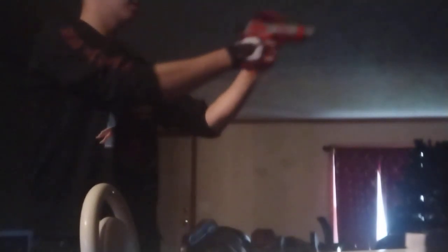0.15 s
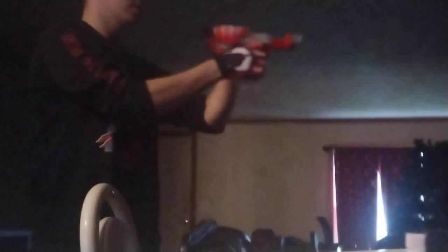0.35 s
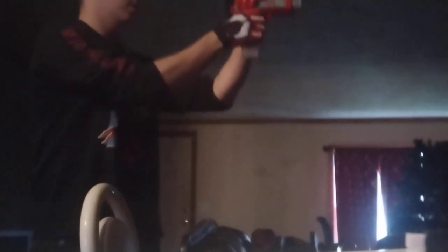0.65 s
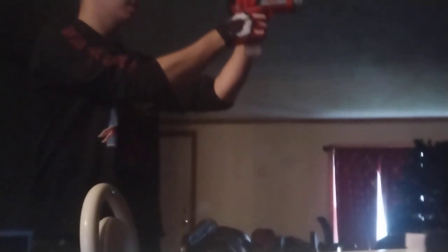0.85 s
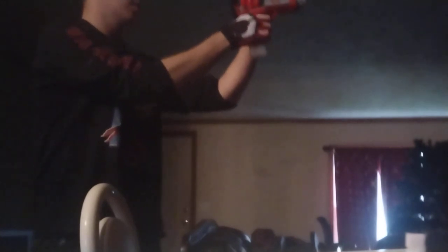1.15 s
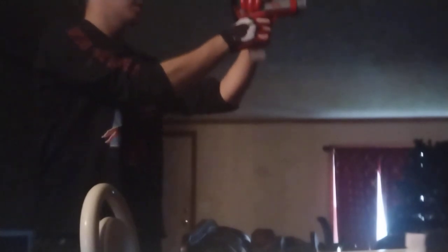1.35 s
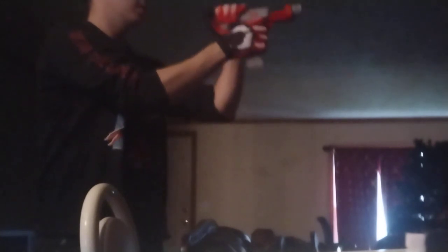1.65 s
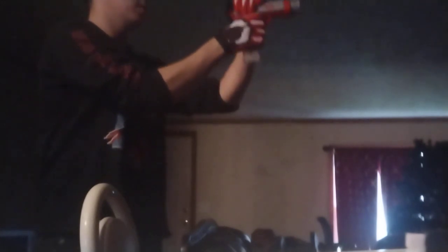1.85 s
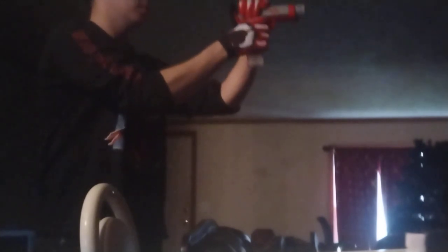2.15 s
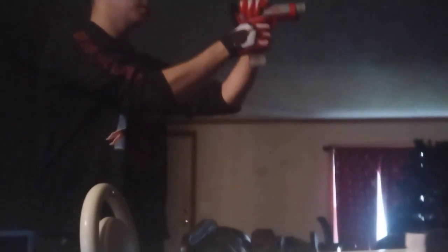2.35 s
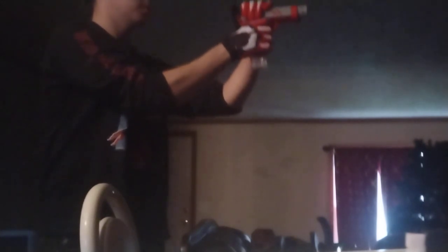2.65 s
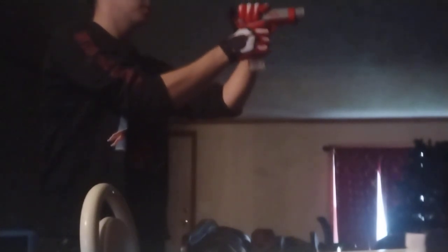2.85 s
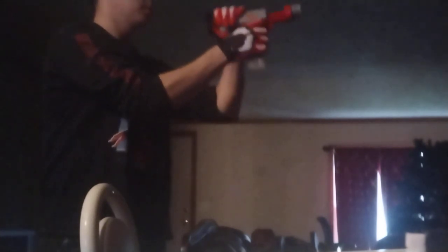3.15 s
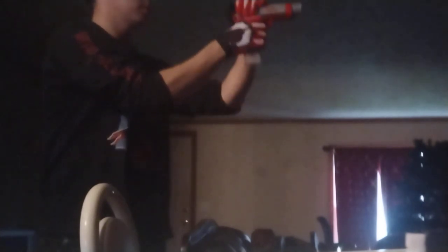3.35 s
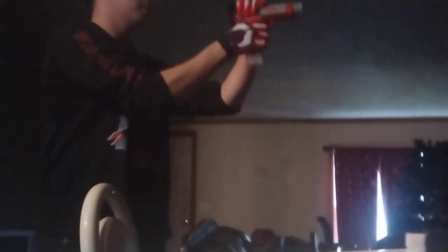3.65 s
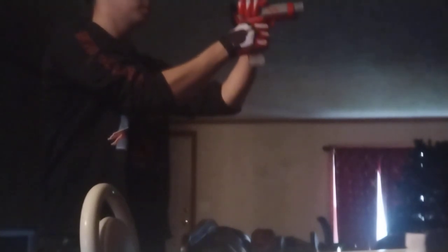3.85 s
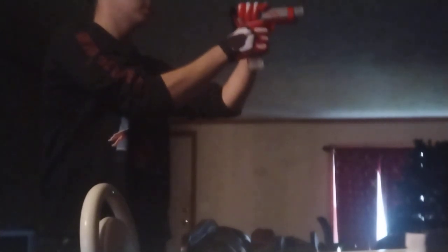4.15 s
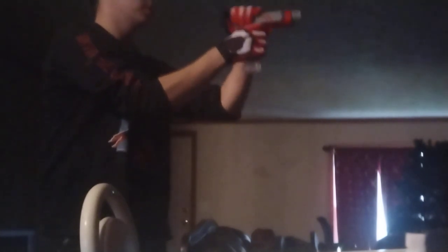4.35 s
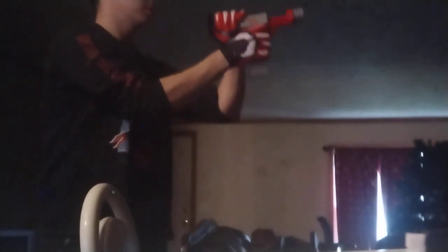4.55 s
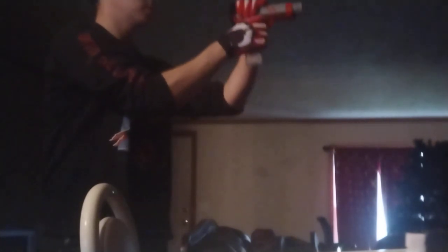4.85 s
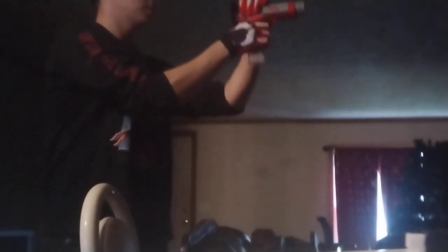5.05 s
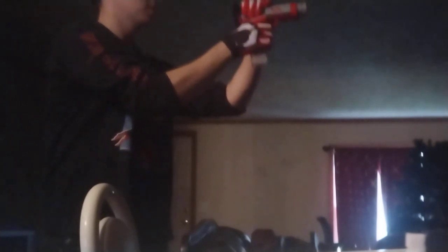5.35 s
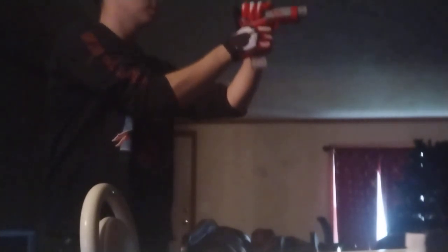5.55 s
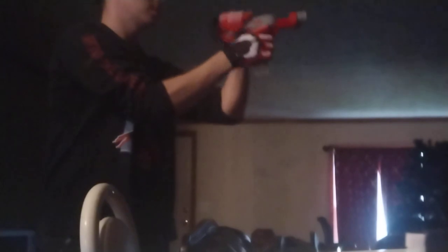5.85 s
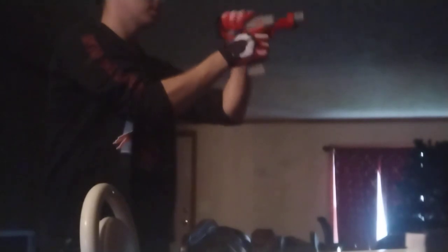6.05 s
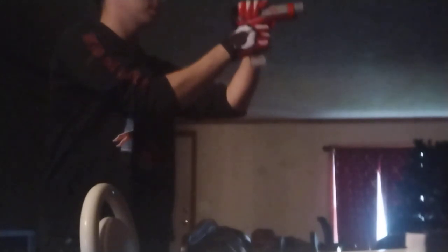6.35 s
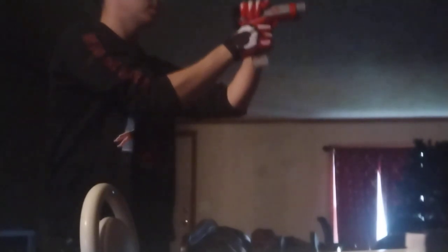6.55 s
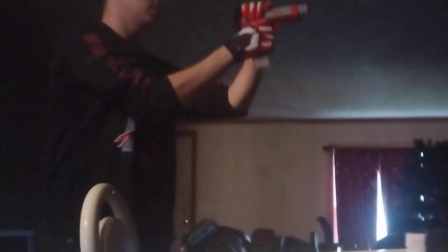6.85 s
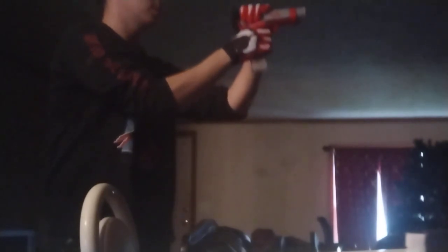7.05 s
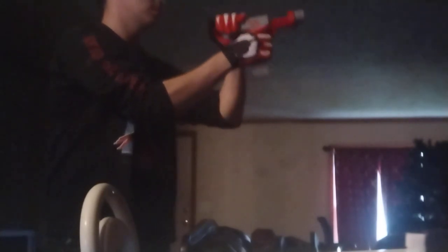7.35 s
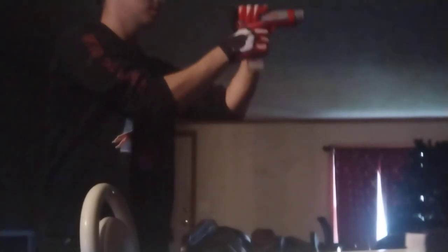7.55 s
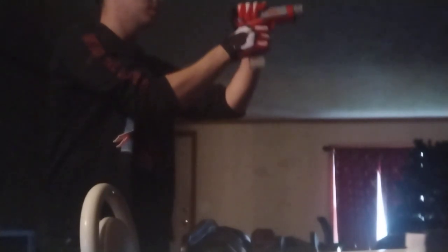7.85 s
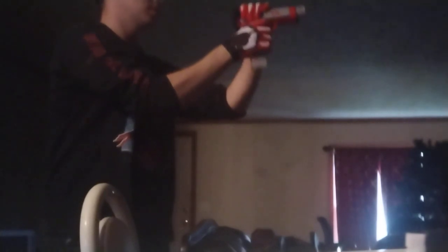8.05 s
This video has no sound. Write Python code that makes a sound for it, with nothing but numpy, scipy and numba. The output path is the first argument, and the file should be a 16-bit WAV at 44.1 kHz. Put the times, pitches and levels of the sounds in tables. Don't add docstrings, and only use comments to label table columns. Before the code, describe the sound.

A stereo microphone about two metres away in a small furnished room hears a spring toy blaster over faint, low, slightly swelling hum. The tail of a pop opens the scene; a trigger click at 0.3 s leads to a quick rising plastic zip at 0.4 and a bright, hard slide slam at 0.64. A dull, hollow air pop follows at 1.3, a louder zip at 1.6 and the hardest slam at 1.8, with a soft dart thud just after. The cycle repeats more slowly: pops at 2.7, 4.05, 5.45 and a fainter one at 6.86; ratcheting pulls at 3.0, 4.4, 5.9 and 7.3; somewhat softer slams at 3.35, 4.8, 6.2 and 7.6. Tiny clicks and catch ticks surround the strokes. Muffled dart landings come near 4.6 and, more heavily, 7.4. Each impact has a short, dense room echo. A small click ends it at 8.0.

```python
import sys
import numpy as np
from scipy import signal
from scipy.fft import rfft, irfft
from scipy.io import wavfile
from scipy.ndimage import uniform_filter1d
from numba import njit

SR = 44100
rng = np.random.default_rng(int(sys.argv[2]) if len(sys.argv) > 2 else 0)


def unload_wav(signal):
    wavfile.write(
        sys.argv[1],
        SR,
        np.round(np.clip(np.atleast_2d(signal).T, -1, 1) * 32767).astype(np.int16),
    )


def gain_from_db(level_db):
    decades = np.asarray(level_db, float) / 20
    return 10 ** decades


N = 361619
SIZE = 8192

# t/s, peak level/dB, bass level/dB, treble level/dB, low ring f/Hz
SLAMS = [
    (0.637, -7.5, -4.5, 7.5, 1180),
    (1.817, -7, -10.5, 3, 1365),
    (3.352, -13, -0.5, 3, 987),
    (4.786, -12, 0, 2.5, 1023),
    (6.211, -11.5, -0.5, 2.5, 1126),
    (7.593, -11, -1, 3, 1228),
]
# f/Hz, level/dB
CLICK_COLOUR = [(59, -44.5), (100, -20.5), (615, -1.5), (778, -5), (865, 3.5), (1540, -1), (3620, -3),
                (7820, -14.5), (15200, -32), (16500, -33.5)]


def shots():
    # t/s, peak level/dB, bass level/dB, treble level/dB, shell ring f/Hz
    pops = [
        (-.07, -22.5, 3.5, 5, 2210),
        (1.3244, -16, -2, 9, 3213),
        (2.6805, -17, 1.5, 2.5, 2680),
        (4.048, -15.5, -1.5, 2, 2250),
        (5.4525, -18, 0.5, -2.5, 2760),
        (6.856, -26, 3, -8.5, 2530),
    ]
    # f/Hz, level/dB
    pop_colour = [(24, -55.5), (40, -48.5), (71, -12.5), (141, -5.5), (427, -1.5), (485, -3.5), (933, -1.5),
                  (1630, -9), (2090, -6), (2260, -9), (4930, -9.5), (14900, -27.5), (16500, -52.5)]
    barrel_hz = 596
    return blows([(*row, barrel_hz) for row in pops], pop_colour, crack_s=.002, rattle_s=.0063, rattle_db=-8,
                 near_db=5.6, shade_db=-14.5, ring_db=4.4, ring_width=.26, body_hz=160)


def slams():
    # f/Hz, level/dB
    slam_colour = [(59, -53), (100, -31.5), (310, -29.5), (602, -4.5), (684, -12), (1030, -3.5), (2080, -1),
                   (3250, -9), (5920, -12.5), (15200, -40.5), (16500, -52.5)]
    slide_hz = 1822
    return blows([(*row, slide_hz) for row in SLAMS], slam_colour, crack_s=.0014, rattle_s=.005, rattle_db=-11.5,
                 near_db=-1.1, shade_db=2, ring_db=2.8, ring_width=.15, body_hz=370)


def slide():
    # start t/s, caught t/s, top rib rate f/Hz, zip level/dB, caught whistle level/dB
    pull_strokes = [
        (0.396, 0.467, 9000, -36, -37),
        (1.562, 1.629, 8910, -31.5, -28.5),
        (3.006, 3.103, 7090, -35, -33.5),
        (4.427, 4.536, 5557, -39, -29.5),
        (5.856, 5.956, 6220, -34.5, -32),
        (7.256, 7.364, 6553, -36, -35.5),
    ]
    # start t/s, runs free t/s, crawl rate f/Hz, top rate f/Hz, zip level/dB
    push_strokes = [
        (.559, .598, 3098, 8910, -35.5),
        (1.745, 1.782, 3529, 8852, -35.5),
        (3.256, 3.305, 2800, 6600, -39.5),
        (4.678, 4.74, 2625, 6050, -39.5),
        (6.109, 6.16, 2709, 6103, -41),
        (7.499, 7.542, 2800, 7430, -37),
    ]
    # f/Hz, level/dB
    rib_colour = [(700, -7), (1500, -3), (2700, 0.5), (4200, -1), (5600, 5.5), (7000, 4.4), (9000, -4.5),
                  (12000, -17)]
    # f/Hz, level/dB
    scrape_colour = [(120, -37.5), (300, -11.5), (700, 4.5), (1400, 4.5), (2400, 2.5), (4000, -13.5),
                     (6500, -9), (9500, -23.5), (12000, -29.5), (14000, -32), (16500, -34)]
    load_hz, crawl_hz = 2800, 3004
    tremor = .04
    flutter_db, second_db, third_db = 2.5, -10.5, -22
    blur_db, grit_db, scrape_db = -10, 4.5, -4.5

    pulls, drags = zip(*(pull(*row) for row in pull_strokes))
    pushes, shoves = zip(*(push(*row, slam[0]) for row, slam in zip(push_strokes, SLAMS)))
    hz, on = played(pulls + pushes, column=1)
    db = played(pulls + pushes, column=2)[0]
    back = played(pulls, column=1)[1] * np.clip(hz / load_hz, 0, 1) ** 2

    shake = unit(uniform_filter1d(smooth_noise(200), 200))
    hz = hz * (1 + tremor * shake / (1 + (hz / crawl_hz) ** 4))
    wobble, flutter, patchy, loose = (unit(smooth_noise(width)) for width in (24, 60, 350, 12))
    phase = 2 * np.pi * np.cumsum(hz * (1 + (.02 + hz / 400000) * wobble)) / SR
    ribs = gain_from_db(on_log(rib_colour, hz)) * np.sin(phase)
    ribs = ribs + back * gain_from_db(on_log(rib_colour, 2 * hz) + second_db) * np.sin(2 * phase)
    audible = 3 * hz < SR / 2.5
    ribs = ribs + back * audible * gain_from_db(on_log(rib_colour, 3 * hz) + third_db) * np.sin(3 * phase)
    blur = gain_from_db(blur_db) * np.sin(2 * np.pi * np.cumsum(hz * (.55 + .3 * loose)) / SR)
    gain = on * (hz > 0) * gain_from_db(db + flutter_db * np.minimum(flutter, 1))
    ribs = gain * gain_from_db(4 * np.minimum(patchy, .7)) * ribs
    blur = gain * blur

    grains = rng.exponential(size=N // 16 + 1).repeat(16)[:N]
    grit = rng.standard_normal(N) * gain_from_db(grit_db * uniform_filter1d(grains, 16))
    drag_db, dragging = played(drags + shoves, column=1)
    scrape = dragging * (drag_db < 0) * gain_from_db(drag_db + scrape_db) * unit(shaped(grit, scrape_colour))
    scrape = blur + scrape
    return np.pad([ribs + scrape, gain_from_db(-1) * ribs + scrape], ((0, 0), (SIZE, SIZE)))


def pull(start, caught, top_hz, db, caught_db):
    from_hz, loaded = 800, .82 * top_hz
    hold, jump = caught - .01, caught - .003
    start_db, late_db, drag_db = db - 20.5, db - 7, db - 24
    third = start + (hold - start) / 3
    ribs = [(start, from_hz, start_db), (third, (2 * from_hz + loaded) / 3, db),
            (hold, loaded, late_db), (jump, loaded, late_db),
            (caught, top_hz, caught_db), (caught + .022, top_hz, caught_db - 13.5)]
    scrape = [(start, start_db - 24), (third, drag_db), (caught - .035, drag_db),
              (caught, db + 4), (caught + .017, db - 24.5)]
    return ribs, scrape


def push(start, free, crawl_hz, top_hz, db, slam):
    ribs = [(start, 1600, db), (start + .012, crawl_hz, db), (free, .82 * crawl_hz, db - 5.5),
            (free + .025, .88 * top_hz, db - 5.5), (slam, top_hz, db - 3)]
    scrape = [(start, db - 3.5), (free, db - 4.5), (slam, db + 11.5)]
    return ribs, scrape


def played(tables, column):
    t, value, on = np.arange(N) / SR, np.zeros(N), np.zeros(N)
    for rows in map(np.array, tables):
        now = (t >= rows[0, 0]) & (t < rows[-1, 0])
        value[now] = np.interp(t[now], rows[:, 0], rows[:, column])
        on[now] = 1
    return value, uniform_filter1d(on, size=64)


def clicks():
    # t/s, peak level/dB, bass level/dB, treble level/dB, low ring f/Hz
    click_events = [(0.337, -29, -11.5, -20, 965), (1.003, -39.5, 24.5, 0, 700), (1.011, -44, 8, 2.5, 950),
                    (1.161, -34, -1.5, -0.5, 1300), (2.512, -36, -4.5, -1, 1158),
                    (2.542, -39.5, 8.5, -11, 1270), (2.55, -44.5, 22.5, -6.5, 890),
                    (3.25, -42.5, 15.5, 9, 775), (3.873, -31, -5.5, -6, 930), (4.024, -41, 11.5, 26, 578),
                    (4.642, -31.5, 24.5, 24, 780), (5.286, -30.5, 7, 7.5, 893), (6.117, -41, 3, -2, 881),
                    (6.611, -44.5, -1, -1, 515), (6.688, -35, -1, 5.5, 1895), (7.967, -53, 22.5, 8, 855),
                    (8.044, -33.5, -4.5, -3.5, 930)]
    trigger_hz, sear_hz = 2603, 3430
    return blows([(*row, trigger_hz, sear_hz) for row in click_events], CLICK_COLOUR, crack_s=.0031, rattle_s=.012,
                 rattle_db=-14.5, near_db=3.77, shade_db=-2.2, ring_db=4.7, ring_width=.049, body_hz=510)


def ticks():
    # t/s, peak level/dB, high ring f/Hz
    tick_events = [(0.455, -36, 2790), (0.48, -38.5, 1731), (0.491, -39, 2080), (1.618, -39.5, 1841),
                   (1.639, -33, 2153), (3.089, -49, 2200), (3.122, -40, 1800), (4.542, -44.5, 1500),
                   (5.831, -66, 1000), (5.944, -42, 2000), (5.972, -38, 2280), (7.347, -40, 2194),
                   (7.382, -36, 1780)]
    bass_db, treble_db, catch_hz = -5, -7.5, 1460
    events = [(s, db, bass_db, treble_db, catch_hz, hz) for s, db, hz in tick_events]
    return blows(events, CLICK_COLOUR, crack_s=.0003, rattle_s=.003, rattle_db=-16,
                 near_db=6, shade_db=-2.7, ring_db=5, ring_width=.086, body_hz=510)


def thuds():
    # t/s, peak level/dB, bass level/dB, treble level/dB, low ring f/Hz
    landings = [
        (0.4284, -29.5, -12.5, 14.5, 657),
        (1.8875, -27, 10, -30.5, 450),
        (3.675, -52, 1, 3, 359.8),
        (4.6336, -31.5, -3, 4, 480),
        (6.081, -56, -7.5, 1.5, 608),
        (7.431, -23, 15.5, -14.5, 491),
    ]
    # f/Hz, level/dB
    thud_colour = [(35, -58.5), (60, -19), (291, -10.5), (367, -0.5), (1100, -4), (1590, -17.5),
                   (2330, -10.5), (6000, -53.5), (7800, -77), (13200, -120)]
    dart_hz = 820
    return blows([(*row, dart_hz) for row in landings], thud_colour, crack_s=.001, rattle_s=.006, rattle_db=-8,
                 near_db=4.7, shade_db=-1.5, ring_db=2, ring_width=.17, body_hz=300)


def blows(events, colour, crack_s, rattle_s, rattle_db, near_db, shade_db, ring_db, ring_width, body_hz):
    bounce_s, grip_s, free_s = .0042, .029, .07
    out = np.zeros((2, N + 2 * SIZE))
    t, hz = np.arange(SIZE) / SR, np.fft.rfftfreq(SIZE, 1 / SR)
    bass = np.exp(-(np.log2((hz + 1) / body_hz) / 1.4) ** 2)
    treble = 1 / (1 + (4000 / (hz + 1)) ** 2)
    decay = np.exp(-t / np.array([[grip_s], [free_s]]))
    for s, peak_db, bass_db, treble_db, *rings in events:
        chance = rng.standard_normal((2, SIZE))
        crack = np.exp(-t / crack_s)
        bounce = gain_from_db(-7.5 + 3.9 * np.tanh(chance[1, 0])) * np.exp(-np.abs(t - bounce_s) / crack_s) * (t > bounce_s)
        rattle = gain_from_db(rattle_db + 3.75 * chance[1]) * np.exp(-t / rattle_s)
        force = rfft(chance[0] * (crack + bounce + rattle))
        ring = sum(ring_db / (1 + (2 * (hz - f) / (ring_width * f)) ** 2) for f in rings)
        ring = ring * (1 + .74 / (1 + (hz / 1200) ** 4))
        db = on_log(colour, hz) + bass_db * bass + treble_db * treble + ring
        shade = causal(near_db + .9 * ring + shade_db / (1 + (1500 / (hz + 1)) ** 2))
        even = force / np.abs(force) * causal(db)
        straight = even * shade * np.sqrt(np.abs(force) / np.abs(force).mean())
        blow = irfft([straight, even]) * decay
        i = SIZE + int((s + .0008) * SR)
        out[:, i:i + SIZE] += blow * gain_from_db(peak_db) / np.sqrt(np.mean(blow[1, :SIZE // 32] ** 2))
    return out


def causal(db):
    cepstrum = irfft(db * np.log(10) / 20)
    cepstrum[1:SIZE // 2] *= 2
    cepstrum[SIZE // 2 + 1:] = 0
    return np.exp(rfft(cepstrum))


def on_log(points, hz):
    f, v = np.transpose(points)
    return np.interp(np.log(np.maximum(hz, 1)), np.log(f), v)


def unit(x):
    return x / np.sqrt(np.mean(x ** 2))


def smooth_noise(width):
    return uniform_filter1d(rng.standard_normal(N), width)


def shaped(x, colour):
    count = x.shape[-1]
    return irfft(rfft(x) * gain_from_db(on_log(colour, np.fft.rfftfreq(count, 1 / SR))), count)


def room(x, wet_db, first_s, build_s):
    # f/Hz, T60/s
    room_t60 = [(60, 0.56), (250, 0.31), (1000, 0.33), (4000, 0.35), (8000, 0.28), (16000, 0.16)]
    # t/s, level over the diffuse tail/dB
    wall_echoes = [
        (.005, 17.5),
        (.015, 7.5),
        (.034, 1),
    ]
    count = 3 * SIZE
    t, hz, echo = np.arange(count) / SR, np.fft.rfftfreq(count, 1 / SR), 0
    noise = rfft(pair(count))
    for centre in 62.5 * 2. ** np.arange(9):
        octaves = np.log2(np.maximum(hz, 1) / centre)
        band = np.cos(np.pi / 2 * np.clip(octaves, -1, 1)) ** 2
        echo = echo + irfft(noise * band, count) * gain_from_db(-60 * t / on_log(room_t60, centre))
    echo = echo * (1 - np.exp(-np.maximum(t - first_s, 0) / build_s))
    echo = echo * gain_from_db(sum(db * np.exp(-((t - s) / .0018) ** 2) for s, db in wall_echoes))
    echo = echo / np.sqrt(np.sum(echo ** 2) / 2)
    return gain_from_db(wet_db) * signal.fftconvolve(x[None], echo)[:, :len(x)]


def pair(count):
    # f/Hz, correlation/1
    likeness = [(100, .95), (300, 0.7), (700, 0), (1300, -.2), (2500, .05), (6000, 0.03)]
    like = np.clip(on_log(likeness, np.fft.rfftfreq(count, 1 / SR)), -1, 1)
    mid, side = rfft(rng.standard_normal((2, count)))
    return irfft(mid * np.sqrt(1 + like) + side * np.sqrt(1 - like) * np.array([[1], [-1]]), count)


def hum():
    # f/Hz, level/dB
    hum_colour = [(15, -51.5), (25, -15.5), (65, 5.5), (146, -0.5), (177, 6.5), (252, 1.5), (538, -1),
                  (617, -0.5), (1090, -10), (1510, -8.5), (8840, -24.5), (15200, -29), (16500, -27.5)]
    hum_db, rumble_db, swell_db, swell_s = -64, -72.5, 5.5, .25
    width = int(swell_s * SR)
    swell = unit(uniform_filter1d(smooth_noise(width), width))
    rumble = unit(shaped(pair(N), [(30, -33), (65, 9), (110, -3), (250, -5), (700, -39.5)]))
    tone = unit(shaped(pair(N), hum_colour))
    return gain_from_db(hum_db) * tone + gain_from_db(rumble_db + swell_db * swell) * rumble


def scene():
    pops, landings = shots(), thuds()
    near = slams() + clicks() + ticks() + slide()
    walls = room(pops[1], wet_db=10.04, first_s=.0005, build_s=.027)
    walls = walls + room(near[1], wet_db=.64, first_s=.0023, build_s=.0099)
    walls = walls + room(landings[1], wet_db=2.8, first_s=.005, build_s=.005)
    return ((pops + near + landings)[0] + walls)[:, SIZE:SIZE + N] + hum()


@njit
def limiter(x, top, ratio, attack, release):
    gain, e = np.ones(len(x)), 0.
    for i in range(len(x)):
        e += (x[i] - e) * (attack if x[i] > e else release)
        if e > top:
            gain[i] = (top / e) ** (1 - 1 / ratio)
    return gain


def roll_off(x):
    return signal.sosfilt(signal.butter(12, 16660, fs=SR, output="sos"), x)


def record(dry):
    x = dry * limiter(np.abs(dry).max(0), gain_from_db(-16), 1.1, 1 / (.0013 * SR), 1 / (.023 * SR))
    x = np.tanh(.93 * x) / .77
    hz = np.fft.rfftfreq(N, 1 / SR)
    top_db = on_log([(30, -7), (60, -7), (90, -1), (11000, -2), (13500, 4), (15700, 9.5),
                     (16100, -12.5), (16600, -21), (16750, -47)], hz)
    lean_db = 3.3 / (1 + (hz / 900) ** 4)
    gain = gain_from_db(top_db + np.array([lean_db, -lean_db]) / 2)
    late = np.exp(-2j * np.pi * hz * np.array([[.00005], [0]]))
    mix = irfft(rfft(x) * gain * late, N)
    return roll_off(mix)


dry = scene()
out = record(dry)
unload_wav(out)
```